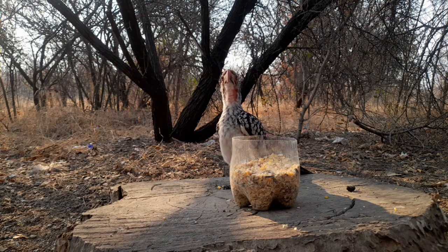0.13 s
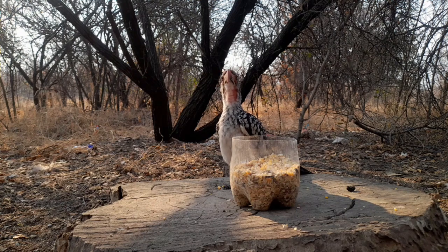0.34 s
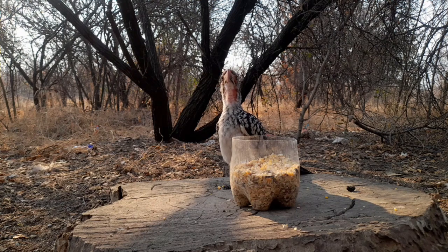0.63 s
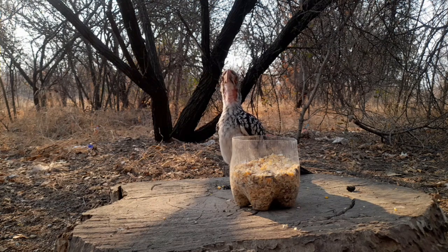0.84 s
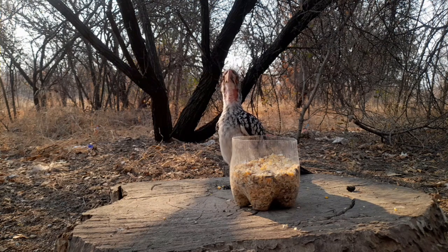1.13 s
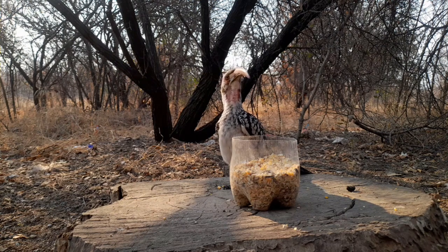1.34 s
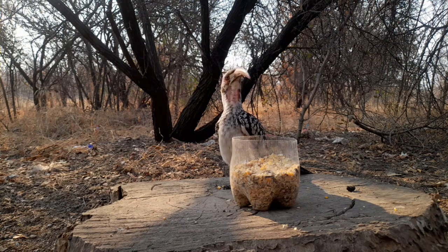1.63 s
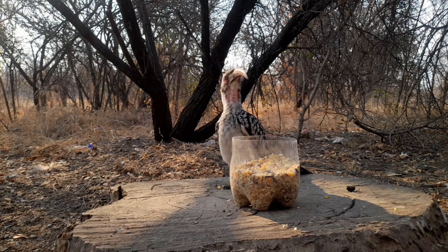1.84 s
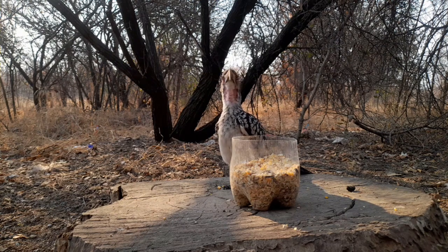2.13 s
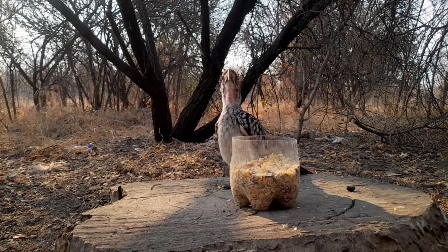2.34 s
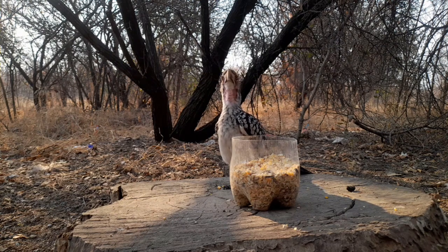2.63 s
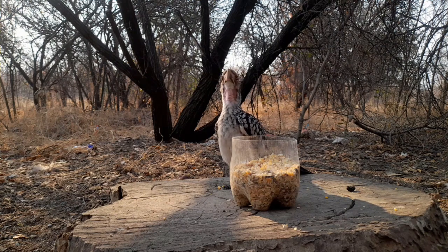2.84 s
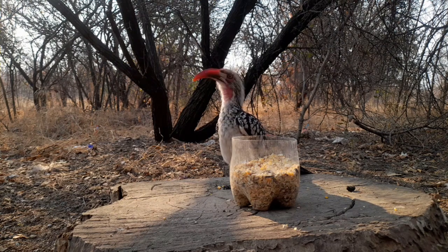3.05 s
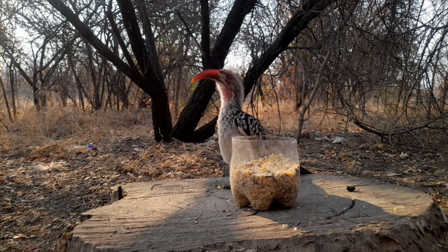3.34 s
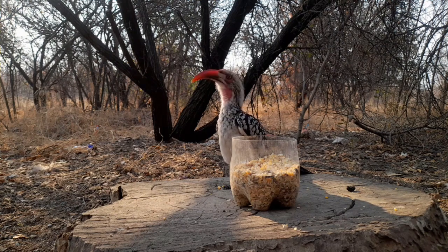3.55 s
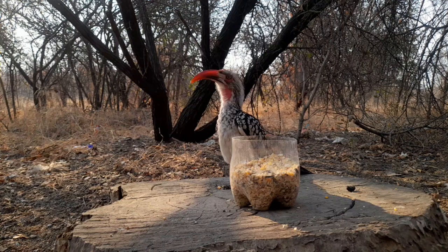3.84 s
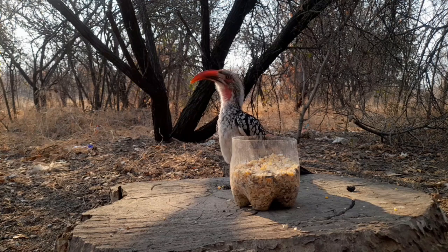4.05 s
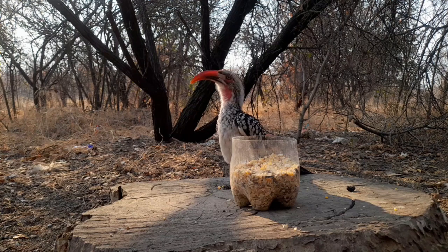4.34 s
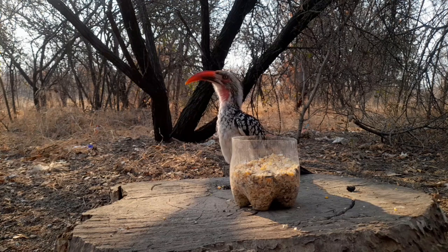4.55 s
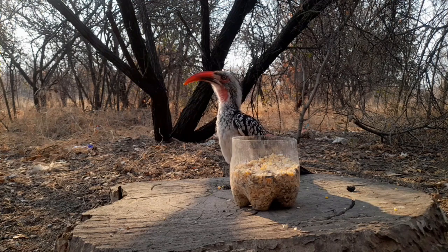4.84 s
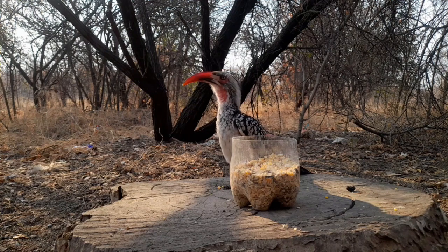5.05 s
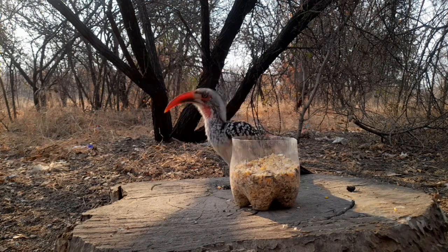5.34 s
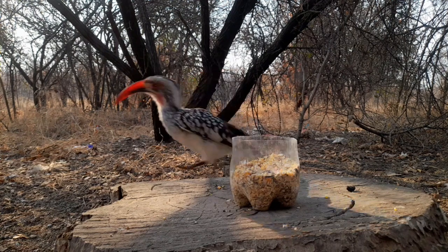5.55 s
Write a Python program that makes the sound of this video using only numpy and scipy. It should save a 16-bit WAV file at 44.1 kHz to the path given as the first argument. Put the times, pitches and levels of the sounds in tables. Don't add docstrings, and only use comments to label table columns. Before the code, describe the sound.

Rapid, steady clucking from one near bird, each note rising and breaking with a breathy pop, then sudden quiet bushland and a tiny scratch.

```python
import sys
import numpy as np
from scipy import signal
from scipy.fft import rfft, irfft
from scipy.io import wavfile
from scipy.ndimage import uniform_filter1d

SR = 44100
rng = np.random.default_rng(int(sys.argv[2]) if len(sys.argv) > 2 else 0)


def decibels_to_gain(level_db):
    exponent = np.asarray(level_db, float) / 20
    return 10 ** exponent


def wrap_up_sound(samples):
    columns = np.atleast_2d(samples).T
    tamed = np.clip(columns, -1, 1)
    steps = np.round(tamed * 32767).astype(np.int16)
    wavfile.write(sys.argv[1], SR, steps)


N = 250488

# start_s [s], hold_s [s], glide_top_hz [Hz], second_voice_db [dB]
CLUCKS = [(0.073, 0.026, 746.5, -22.5), (0.2455, 0.035, 753, -24.5), (0.4269, 0.0295, 753, -17.5),
          (0.6054, 0.0291, 746, -24.5), (0.783, 0.027, 731, -32), (0.9597, 0.029, 754.4, -16),
          (1.1343, 0.032, 758, -21.5), (1.3105, 0.03, 769, -16.5), (1.4841, 0.031, 744, -10.5),
          (1.6577, 0.033, 766, -16.5), (1.831, 0.035, 757.4, -11.5), (2.0051, 0.03, 745, -14.5),
          (2.177, 0.034, 742, -16.5), (2.3552, 0.029, 755, -24.5), (2.5277, 0.031, 763, -19.5),
          (2.7005, 0.03, 752, -22), (2.8723, 0.034, 749, -34.5), (3.112, 0.019, 751.5, -22),
          (3.2868, 0.026, 752, -20), (3.472, 0.031, 756, -19.5), (3.6533, 0.029, 748.5, -30),
          (3.8357, 0.0274, 755.4, -17), (4.0121, 0.0288, 743, -14.5), (4.1926, 0.033, 764, -15.5),
          (4.3744, 0.029, 809.6, -10.5), (4.5547, 0.026, 758, -20), (4.7426, 0.026, 761, -28),
          (4.926, 0.026, 744, -20.5), (5.1056, 0.026, 744, -32)]
# time_s [s], pitch_hz [Hz]
HELD_PITCH = [(0.0, 604.4), (0.5, 603.8), (1.3, 596.8), (2.4, 603.4), (2.85, 602.8), (3.3, 607.4),
              (4.7, 605.2), (5.2, 601)]
# multiple [x pitch], level_db [dB re fundamental], steepness [dB per dB of effort]
OVERTONES = [(2.003, -5, 0.67), (3, -25, 0.85), (4, -31, 0.89), (5, -35.5, 1.2), (6, -48, 0.47),
             (7, -42, 0.77), (8, -43, 0.99), (9, -49.5, 0.52), (10, -48.5, .7), (11, -48.5, 1.9),
             (12, -53.5, 0.98), (12.8, -49.5, 0.85), (14.1, -59, .7), (15.1, -58.5, .7), (18, -61, .7),
             (19.05, -53.5, .8), (20, -54.5, 1.2), (21, -52, 1.2)]
PULSE_PHASE = {2: .5, 3: 1.7, 4: .8, 5: 2.0}
# pitch_hz [Hz], width_hz [Hz], level_db [dB]
THROAT = [(2284, 290, -8.5), (2540, 87, -7.5), (3550, 260, -12.5)]
# pitch_hz [Hz], level_db [dB]
PUFF_COLOUR = [(120, -7), (420, 0), (950, 6.5), (1600, 4), (2300, -9.5), (3000, -16), (3600, -22),
               (4800, -22), (6800, -31), (7700, -23.5), (9300, -36), (12500, -23.5), (15900, -31)]
# pitch_hz [Hz], width_hz [Hz], level_db [dB]
PORT_COLOUR = [
    [(1290, 150, 12), (1360, 140, -6), (3000, 1100, -5), (7560, 360, 10.5)],
    [(1217, 220, 8), (1600, 130, -5.5), (420, 330, 3.0), (2000, 1000, 1.5), (8100, 2700, -7)],
]
# delay_s [s], left_db [dB], right_db [dB]
ECHOES = [
    (.025, -36, -37),
    (0.044, -47, -46.5),
    (0.061, -50, -50),
]
# time_s [s], peak_db [dB]
CLAW = [
    (5.6665, -58),
]
# middle_s [s], half_length_s [s], level_db [dB]
RUSTLE = [
    (3.712, 0.13, -68.5),
    (4.283, .035, -73),
]
# time_s [s], pitch_hz [Hz], level_db [dB]
FAR_CHIRP = [(.488, 6200, -91.5), (.494, 6020, -69), (.5, 5800, -62.5), (.505, 4980, -82),
             (.525, 4900, -74), (0.553, 5020, -80)]
# middle_s [s], length_s [s], pitch_hz [Hz], level_db [dB]
FAR_NOTES = [(0.509, 0.017, 6300, -72.5), (3.599, 0.053, 1840, -80.5), (3.637, 0.058, 1705, -78),
             (3.986, 0.043, 2060, -74), (3.989, .03, 3160, -85), (3.991, .05, 1750, -72.5),
             (4.11, 0.13, 2095, -73), (4.308, 0.019, 2196, -77)]
# time_s [s], level_db [dB]
BREEZE = [(0.0, -82.5), (0.68, -79.5), (1.45, -81.5), (1.85, -79.5), (2.42, -79), (3.29, -78.5), (5.0, -80),
          (5.13, -82.5), (5.68, -83)]
# middle_s [s], half_length_s [s], level_db [dB]
GUSTS = [(0.121, 0.047, 1.5), (.31, 0.021, 0), (2.17, 0.056, 2), (2.422, 0.038, 5.5), (4.078, 0.1, 2.5),
         (5.601, 0.014, 6.5)]
# pitch_hz [Hz], level_db [dB per Hz]
RUMBLE = [(24, -30), (41, 2), (60, -1.5), (106, -3), (160, -18.5), (210, -45), (350, -120)]
MURMUR = [(130, -1), (200, -4), (330, -2.5), (500, -8.5), (850, -13.5), (1400, -20.5), (2200, -23),
          (3000, -26.5), (3800, -33.5)]
HISS = [(1180, -36), (2000, -5.5), (3330, -12), (3830, -4.5), (4140, -5), (6320, -1.5), (7780, -12.5),
        (11200, -6.5), (12300, -4), (14300, -6), (15800, -5.5)]
# pitch_hz [Hz], likeness [0-1]
LIKENESS = [(30, 0.95), (100, .7), (300, 0.34), (800, 0.91), (1500, 0.061), (16000, 0)]
# pitch_hz [Hz], left_minus_right_db [dB]
LEAN = [(60, -6), (110, -2.5), (200, -2.5), (380, -3), (700, 0), (1290, -3.5), (2380, -0.5), (4400, -7),
        (8120, 1.5), (15000, 1)]


def hornbill():
    voice, air, flutter = np.zeros(N), np.zeros(N), drift(99)
    cluck_db, puff_db = -23, -22.5
    chance = rng.standard_normal((len(CLUCKS), 32))
    for (start, hold, top_hz, second_db), luck in zip(CLUCKS, chance):
        level_db = cluck_db - 737.5 * past(.026, hold)
        level_db -= 3 * past(start, 4.81)
        fall_s = 0.0166 - 0.18 * (hold - .03) - 2.5e-5 * (top_hz - 755)
        span = slice(round((start - .012) * SR), round((start + .16) * SR))
        t = np.arange(span.start, span.stop) / SR - start - hold
        phase = np.where(t < 0, t / hold, t / fall_s)
        wobble = flutter[span]
        tone = first_voice(phase, wobble, start, hold, top_hz, luck)
        hz, slide_db, air_db = second_voice(phase)
        hz = hz * (1 + .04 * luck[0] + .04 * wobble[::-1])
        slide = 2 * np.pi * np.cumsum(hz) / SR + 3 * luck[1]
        tone += decibels_to_gain(second_db + slide_db + 4.5 * wobble) * np.cos(slide)
        voice[span] += np.sqrt(2) * decibels_to_gain(level_db) * tone
        air[span] += decibels_to_gain(level_db + puff_db + air_db + luck[2])
    return voice, air


def first_voice(phase, wobble, start, hold, top_hz, luck):
    glide, body_db, low_db, high_db = effort(phase)
    held_hz = along(HELD_PITCH, start)[0]
    shaky = wobble * np.clip(phase - .5, 0, 1)
    ragged = wobble[::-1] * np.clip(3 * phase, 0, 1)
    pitch_hz = (held_hz + glide * (top_hz - held_hz)) * (1 + 0.049 * shaky)
    turn = 2 * np.pi * np.cumsum(pitch_hz) / SR
    tone = decibels_to_gain(body_db + 3.5 * shaky) * np.cos(turn)
    dull_db = 1300 * past(.026, hold)
    for (k, db, steep), own in zip(OVERTONES, luck[3:]):
        k = round(k)
        effort_db = low_db if k < 4 else high_db - dull_db
        level_db = db + steep * effort_db
        level_db = level_db + 2.2 * min(k - 1, 4) * ragged + 0.16 * min(k - 1, 8) * own
        tone += decibels_to_gain(level_db) * np.cos(k * turn + PULSE_PHASE.get(k, own))
    return tone


def effort(phase):
    onset = np.clip((phase + 1.069) / .12, 0, 1)
    swell = onset * (1 - .78 * past(-phase, 0) ** 1.406)
    swell_db = 20 * np.log10(np.maximum(swell, 1e-4))
    release_db = -7.5 * past(phase, 0) ** 2.33
    glide_at = -0.19
    glide = 1.549 * (1 - np.exp(-past(phase, glide_at) / .9)) - 2.7 * past(phase, 1.15)
    glide = np.maximum(glide, -.6) + 1.5 * past(-phase, .88)
    low_db = np.maximum(-0.12 - 42 * past(phase, -.13) ** 2, -15.5 + 2.1 * release_db)
    high_db = 5 - 13.5 * np.clip((phase - glide_at) / 0.25, 0, 1) - 34 * past(phase, 0.27)
    return eased([glide, swell_db + release_db, 2.07 * swell_db + low_db, 2.3 * swell_db + high_db])


def second_voice(phase):
    hz = 1258 * np.exp(-.35 * phase)
    slide_db = -3.5 - 452.5 * past(-phase, -.3) ** 2 - 71.5 * past(phase, 1.3) ** 2
    rise_db = np.maximum(-5 + 18.5 * phase, 38.5 * (phase - 0.043))
    air_db = np.minimum(rise_db, 0) - 90 * past(-phase, 0.91) - 8 * past(phase, .55)
    return eased([hz, slide_db, air_db])


def eased(columns):
    return uniform_filter1d(uniform_filter1d(columns, size=45, axis=1), size=45, axis=1)


def throat(x):
    for hz, width_hz, db in THROAT:
        x = peak(x + 1e-18, hz, width_hz, db)
    return x


def head_turn(voice):
    shaded = peak(voice + 1e-18, 4600, 1000, -6)
    return np.where(np.arange(N) / SR < 3.0, voice, shaded)


def ports(pair):
    left_lead_s = 5e-5
    out = [np.interp(np.arange(N) + left_lead_s * SR, np.arange(N), pair[0]), pair[1]]
    for side, modes in enumerate(PORT_COLOUR):
        for hz, width_hz, db in modes:
            out[side] = peak(out[side] + 1e-18, hz, width_hz, db)
    return np.array(out)


def claw(hiss):
    (s, db), = CLAW
    t = np.arange(N) / SR - s
    bright = peak(hiss, 12000, 2500, 9.6)
    return bright * decibels_to_gain(db - 8.5 - 60 * np.abs(t) / np.where(t < 0, .02, .03))


def bush(x):
    tail_db, t60_s = -38, 0.35
    t = np.arange(round(.5 * SR)) / SR
    tail = rng.standard_normal((2, len(t))) * decibels_to_gain(-60 * t / t60_s) * np.clip(t / 0.047, 0, 1)
    tail *= decibels_to_gain(tail_db) / np.sqrt(np.sum(tail ** 2, axis=1, keepdims=True))
    for delay, left_db, right_db in ECHOES:
        tail[:, round(delay * SR)] += decibels_to_gain([left_db, right_db])
    middle = signal.butter(2, [670, 1520], "band", fs=SR, output="sos")
    thin = signal.sosfilt(middle, x)
    return signal.fftconvolve(thin[None], tail, axes=1)[:, :N]


def rustle():
    clicks = rng.standard_normal((2, N)) * (rng.random((2, N)) < 1500 / SR)
    mid_band = signal.butter(2, [1900, 3600], "band", fs=SR, output="sos")
    crackle = rms_one(signal.sosfilt(mid_band, clicks))
    t = np.arange(N) / SR
    return crackle * sum(decibels_to_gain(db - 26 * ((t - s) / half) ** 2) for s, half, db in RUSTLE)


def far_birds():
    t = np.arange(N) / SR
    chirp = [(0, 6480, -140), (.48, 6280, -140)] + FAR_CHIRP + [(.57, 4900, -140)]
    hz, db = along(chirp, t)
    notes = decibels_to_gain(db) * np.cos(2 * np.pi * np.cumsum(hz * (1 + 0.039 * drift(150))) / SR)
    for middle, length, hz, db in FAR_NOTES:
        near = slice(round((middle - length) * SR), round((middle + length) * SR))
        fade_db = 8 * ((t[near] - middle) / length * 2) ** 4
        notes[near] += decibels_to_gain(db - fade_db) * np.cos(2 * np.pi * hz * t[near])
    notes = notes * decibels_to_gain(4.0 * drift(120))
    t = t[:SR // 4]
    smear = rng.standard_normal((2, len(t))) * decibels_to_gain(-26 - 60 * t / 0.12)
    return notes * decibels_to_gain([[-2], [2]]) + signal.fftconvolve(notes[None], smear, axes=1)[:, :N]


def background(voice, hiss):
    t = np.arange(N) / SR
    breeze_db, = along(BREEZE, t)
    swing_db = breeze_db - breeze_db.mean()
    gust_db = sum(db * np.exp(-((t - s) / half) ** 2) for s, half, db in GUSTS)
    rumble = decibels_to_gain(-57.5 + 0.88 * swing_db + gust_db) * coloured(RUMBLE, patchy_db=.6)
    murmur = decibels_to_gain(-69.5 + 0.72 * swing_db + 0.67 * gust_db) * coloured(MURMUR, patchy_db=-0.1)
    leaves = decibels_to_gain(-74 + 0.81 * swing_db) * hiss
    lingering = gate(3 * voice, 3, 0.11)
    return rumble + gate(voice, 3, 0.021) * (murmur * lingering + leaves)


def gate(voice, gate_db, release_s):
    r = np.exp(-1 / (release_s * SR))
    opened = signal.lfilter([1 - r], [1, -r], np.abs(voice))
    return decibels_to_gain(gate_db * np.tanh(opened / 0.021))


def coloured(spectrum, patchy_db=0.):
    hz = np.maximum(np.arange(N // 2 + 1) * SR / N, 1)
    mid, side = rfft(rng.standard_normal((2, N)))
    alike = np.clip(at_hz(LIKENESS, hz), 0, 1)
    sides = np.array([[1], [-1]])
    pair = np.sqrt(1 + alike) * mid + np.sqrt(1 - alike) * side * sides
    inside = (hz > spectrum[0][0]) & (hz < spectrum[-1][0])
    pair = pair * inside * decibels_to_gain(at_hz(spectrum, hz) + sides * at_hz(LEAN, hz) / 2)
    return rms_one(irfft(pair, N)) * decibels_to_gain(patchy_db * drift(8))


def drift(rate):
    r = np.exp(-80 * np.pi * rate / SR)
    steps = rng.standard_normal(N // 40 + 2002)
    slow = signal.lfilter([1], [1, -2 * r, r * r], steps)[2000:]
    return np.interp(np.arange(N) / 40, np.arange(len(slow)), rms_one(slow))


def peak(x, hz, width_hz, db):
    w, a = 2 * np.pi * hz / SR, decibels_to_gain(db / 2)
    k = np.pi * width_hz / SR
    top = [1 + k * a, -2 * np.cos(w), 1 - k * a]
    return signal.lfilter(top, [1 + k / a, -2 * np.cos(w), 1 - k / a], x)


def past(value, mark):
    return np.maximum(value - mark, 0)


def rms_one(x):
    return x / np.sqrt(np.mean(x ** 2) + 1e-20)


def along(rows, at):
    first, *columns = np.transpose(sorted(map(tuple, rows)))
    return [np.interp(at, first, c) for c in columns]


def at_hz(points, hz):
    return along([(np.log(f), v) for f, v in points], np.log(hz))[0]


def scene():
    voice, air = hornbill()
    voice = head_turn(throat(voice))
    bird = ports(voice + bush(voice)) + air * coloured(PUFF_COLOUR)
    hiss = coloured(HISS, patchy_db=0.93)
    return bird + claw(hiss) + rustle() + far_birds() + background(voice, hiss)


def band_limit(x):
    return signal.sosfilt(signal.butter(12, 15960, fs=SR, output="sos"), x)


def record(dry):
    low_cut = signal.butter(6, 39, "high", fs=SR, output="sos")
    top_cut = signal.cheby2(12, 60, 16150, fs=SR, output="sos")
    mix = signal.sosfilt(np.vstack([low_cut, top_cut]), dry)
    return band_limit(mix)


dry = scene()
out = record(dry)
wrap_up_sound(out)
```